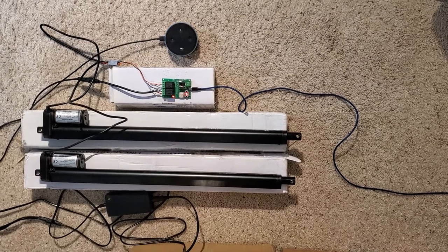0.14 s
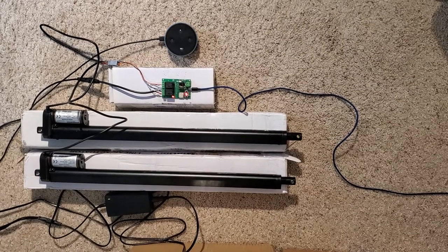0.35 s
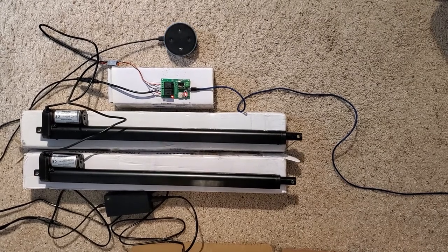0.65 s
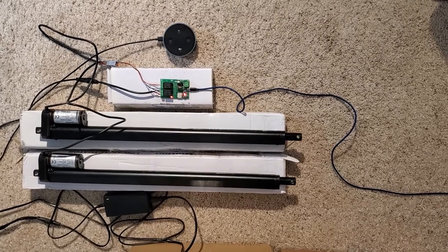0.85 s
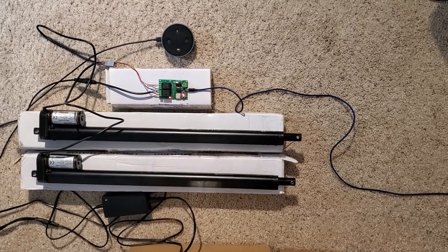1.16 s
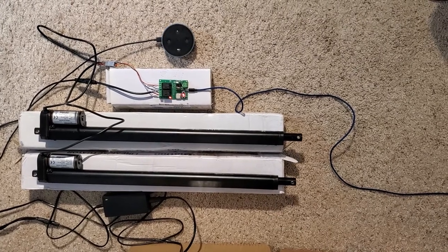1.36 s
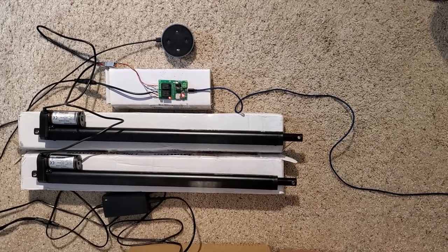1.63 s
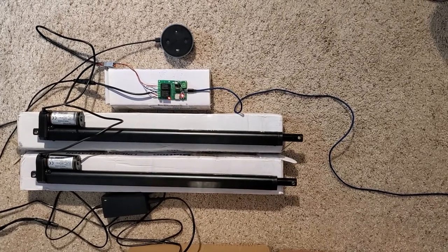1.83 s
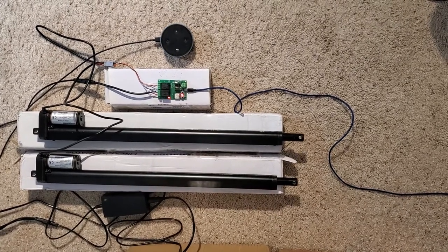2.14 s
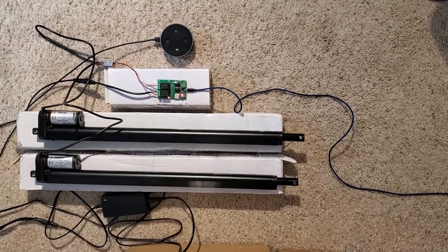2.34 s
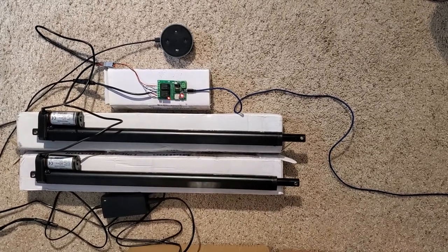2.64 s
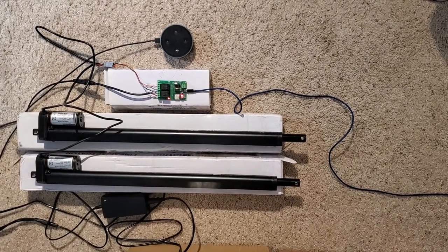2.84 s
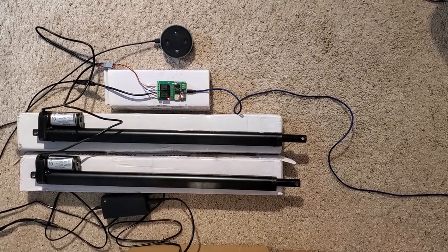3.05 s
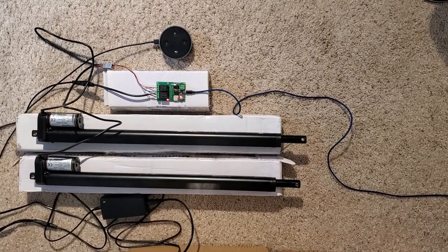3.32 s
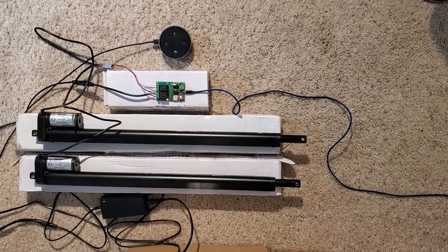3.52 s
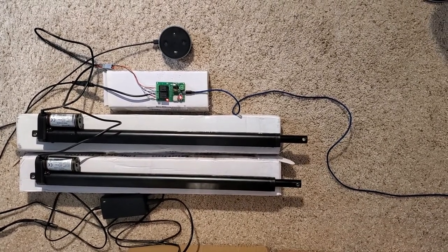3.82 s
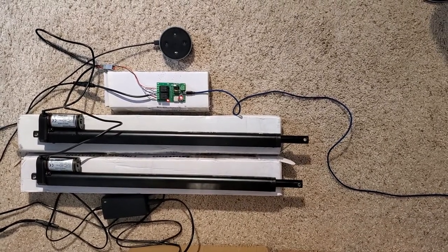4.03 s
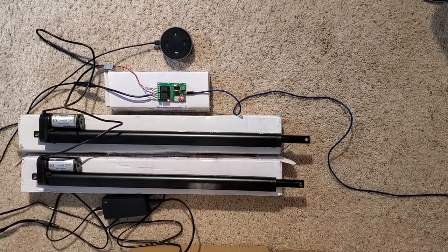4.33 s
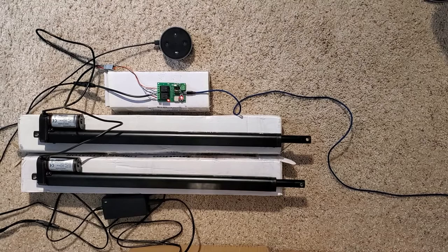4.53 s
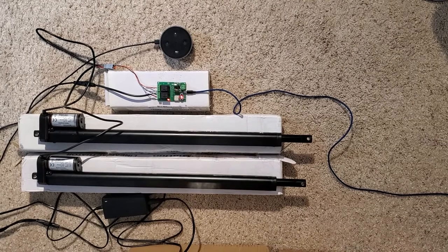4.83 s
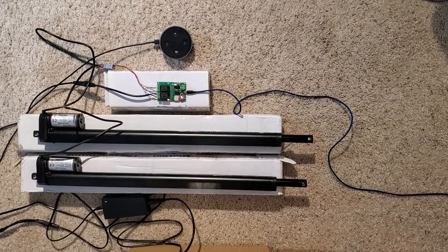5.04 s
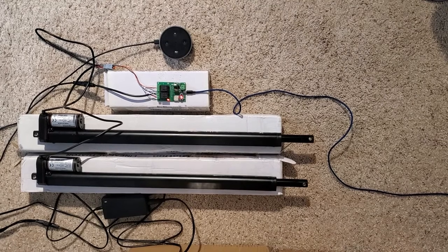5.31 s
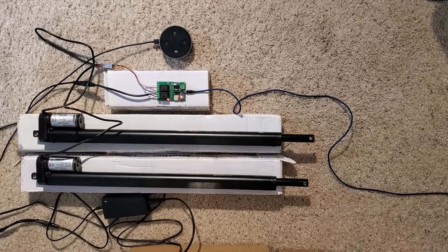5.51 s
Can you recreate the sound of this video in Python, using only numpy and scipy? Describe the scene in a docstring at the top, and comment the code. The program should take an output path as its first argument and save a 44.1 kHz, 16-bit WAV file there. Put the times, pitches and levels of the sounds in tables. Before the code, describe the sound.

A continuous geared motor whir from two drives side by side, with grainy rattle, brush hiss and a slightly growing whine.

```python
"""Two electric linear actuators push their rods out side by side on a carpeted floor, heard from about a metre above.
First both drives settle up to speed, the second slightly faster, so they beat: gear tones locked to each wheel sing
and throb once a turn, random tooth contact rattles the housings, and noise at the brushes hisses.
About halfway the first rod slides more freely: its drive speeds up a little and a motor whine grows.
Towards the end some gear tones have eased off and the hiss has risen; rumble, a faint drone and hum lie beneath."""
import sys
import numpy as np
from scipy import signal
from scipy.fft import rfft, irfft
from scipy.io import wavfile

SR = 44100
rng = np.random.default_rng(int(sys.argv[2]) if len(sys.argv) > 2 else 0)


def generate_wav(signal):
    """Clip the signal to [-1, 1] and save it as 16-bit WAV at the path in sys.argv[1]."""
    frames = np.transpose(np.atleast_2d(signal))
    scaled = np.clip(frames, -1, 1) * 32767
    pcm = np.round(scaled).astype(np.int16)
    wavfile.write(sys.argv[1], SR, pcm)


N = 250047
TIME = np.arange(N) / SR
FREQ = np.maximum(np.fft.rfftfreq(N, 1 / SR), 1)
SIDES = np.array([[1], [-1]])  # adds to the left, subtracts from the right
WHEEL_TURNS_PER_SCREW_TURN, MOTOR_TURNS_PER_WHEEL_TURN = 6, 5


def undb(db):
    """Decibels to gain."""
    return 10 ** (np.asarray(db) / 20)


def walk(rate):
    """Random zigzag with `rate` corners a second; spread near 0.46."""
    corners = rng.standard_normal(1024)
    return 0.56 * np.interp(TIME * rate, np.arange(len(corners)), corners)


def slope(table):
    """Gains along a spectrum of (frequency [Hz], level [dB], ..) points, one row for each level column."""
    hz, *columns = np.transpose(table)
    return undb([np.interp(np.log(FREQ), np.log(hz), column) for column in columns])


def resonances(table):
    """Left and right gains of steep-sided resonances, summed in power."""
    power = 0
    for hz, width, left, right in table:
        peak = 1 / (1 + (2 * (FREQ - hz) / width) ** 2) ** 2
        power = power + undb([[left], [right]]) ** 2 * peak
    return np.sqrt(power)


def colour(x, gain):
    """Bring a white signal to unit level, then give it the density `gain` per root Hz."""
    return irfft(rfft(x / x.std()) * gain * np.sqrt(SR / 2), N)


def room(x, wet_db, t60, apart_hz=1500, left_lead_s=0.00018):
    """Direct sound reaches the left first; a dense decaying tail differs between sides less and less for long waves."""
    decay = np.exp(-np.log(1000) * TIME / t60) * (TIME > .002)
    shared, apart = rfft(rng.standard_normal((2, N)) * decay)
    tail = shared + apart * np.minimum(FREQ / apart_hz, 1) * SIDES
    tail /= np.sqrt(np.mean(np.abs(tail) ** 2))
    direct = np.exp(-2j * np.pi * FREQ * np.array([[0], [left_lead_s]]))
    return irfft(rfft(x) * (direct + undb(wet_db) * tail), N)


def tones(table, turns, phases, flutter, flutter_rate, left_lead_s=.00007):
    """Partials locked to a wheel, left first; uneven tooth contact makes each flutter in level and phase."""
    out = np.zeros((2, N))
    wheel_hz = turns[-1] / TIME[-1]
    for (multiple, left, right), phase in zip(table, phases):
        angle = 2 * np.pi * multiple * turns + phase + flutter * walk(flutter_rate)
        lag = 2 * np.pi * multiple * wheel_hz * left_lead_s
        size = np.sqrt(2) * (1 + flutter * walk(flutter_rate))
        out += size * undb([[left], [right]]) * np.cos([angle, angle - lag])
    return out


def any_phases(table):
    """One random phase a row."""
    return rng.uniform(0, 2 * np.pi, len(table))


def in_step(table):
    """Zero phase for every row: the partials line up at one spot of the wheel and throb once a turn."""
    return np.zeros(len(table))


def scrape(turns, repeat, size=2600):
    """Rough surfaces in contact: a share `repeat` of the roughness power comes round again with every turn."""
    surface = rng.standard_normal(size)
    recurring = surface[(turns * size).astype(int) % size]
    return np.sqrt(repeat) * recurring + np.sqrt(1 - repeat) * rng.standard_normal(N)


def screw_load(turns, offset=.2):
    """The load swings between -1 and 1 once a turn of the lead screw."""
    screw_turns = turns / WHEEL_TURNS_PER_SCREW_TURN
    return np.cos(2 * np.pi * (screw_turns - offset))


def freedom(freed_at_s=2.75, freeing_s=.35):
    """How freely the first rod slides: rises smoothly from 0 (snug) to 1 (free)."""
    return (1 + np.tanh((TIME - freed_at_s) / freeing_s)) / 2


# Gear wheel speed of the first and second drive, before the swing with screw load:
# (settled rate [Hz], slower at the start by [Hz], settling time [s], faster once the first rod is free by [Hz])
DRIVE_SPEEDS = [(16.866, .07, .3, .074), (17.09, .17, .85, 0)]


def wheel_turns(settled_hz, slow_hz, settle_s, freed_hz, bind_sag=.0013):
    """Turns of a wheel that settles up to speed, gains with freedom and loses the share `bind_sag` at full load."""
    hz = settled_hz - slow_hz * np.exp(-TIME / settle_s) + freed_hz * freedom()
    unloaded_turns = np.cumsum(hz) / SR
    return np.cumsum(hz * (1 - bind_sag * screw_load(unloaded_turns))) / SR


# Gear tones of the first drive, before the sway; three low growling ones, then the ringing ones:
# (multiple of the wheel rate [-], left level [dB], right level [dB])
FIRST_GEAR_TONES = [(24, -48, -50), (25, -32, -34), (26, -49, -50), (30, -48, -48), (33, -47, -49),
                    (48, -47, -44), (65, -45, -45), (71, -49, -52), (74, -47, -47), (79, -48, -53),
                    (84, -53, -39), (85, -49, -53), (89, -56, -48), (95, -53, -52), (96, -36, -41),
                    (98, -60, -47), (108, -50, -53), (128, -47, -45), (139, -54, -46), (156, -49, -46),
                    (163, -55, -49), (181, -55, -46)]
# Tooth mesh of the slightly eccentric first wheel and its sidebands, before the lope:
# (multiple of the wheel rate [-], left level [dB], right level [dB])
TOOTH_MESH = [(34, -42, -44), (35, -39, -40), (36, -34, -36)]
# Tones that ease off as the rod comes out, at their mid-way level:
# (multiple of the wheel rate [-], left level [dB], right level [dB])
EASING_TONES = [(60, -38.5, -43), (143, -53, -47), (144, -47, -40), (145, -54, -48)]
# The commutator's octave and its sidebands, before the growth and sway:
# (multiple of the wheel rate [-], left level [dB], right level [dB])
COMMUTATOR_WHINE = [(116, -54, -52), (118, -43, -44), (119, -52, -52), (120, -32, -35), (121, -51, -49),
                    (123, -44, -40)]


def first_gears(turns, tight_spot=.88, whine_spot=0.864, ease_spot=.38,
                low_sway_db=0.5, high_sway_db=-0.26, whine_sway_db=1.9, ease_db=8, lope_db=0.9,
                whine_snug_db=-13, whine_free_db=-1.5):
    """The louder drive: tones that sway with the screw, a throbbing mesh, easing tones and a growing whine."""
    load = screw_load(turns)
    growl, ring = FIRST_GEAR_TONES[:3], FIRST_GEAR_TONES[3:]
    low = tones(growl, turns, any_phases(growl), flutter=.04, flutter_rate=12)
    high = tones(ring, turns, any_phases(ring), flutter=.15, flutter_rate=30)
    # each spot is the point of the wheel, in turns, where that group swells
    mesh = tones(TOOTH_MESH, turns - tight_spot, in_step(TOOTH_MESH), flutter=.13, flutter_rate=16)
    easing = tones(EASING_TONES, turns - ease_spot, in_step(EASING_TONES), flutter=.1, flutter_rate=20)
    whine = tones(COMMUTATOR_WHINE, turns - whine_spot, in_step(COMMUTATOR_WHINE), flutter=.15, flutter_rate=13)

    out = low * undb(low_sway_db * load) + high * undb(high_sway_db * load)
    # the mesh lopes four times a screw turn
    out += mesh * undb(lope_db * screw_load(4 * turns))
    out += easing * undb(ease_db * (.5 - TIME / TIME[-1]))
    whine_db = whine_snug_db + (whine_free_db - whine_snug_db) * freedom()
    return out + whine * undb(whine_db - whine_sway_db * load)


# Gear tones of the second drive: (multiple of the wheel rate [-], left level [dB], right level [dB])
SECOND_GEAR_TONES = [(25, -45, -45), (26, -49, -49), (30, -53, -53), (34, -50, -50), (36, -46, -46),
                     (48, -45, -41), (60, -55, -55), (96, -50, -50), (105, -53, -51), (120, -50, -45),
                     (143, -54, -48)]


def second_gears(turns):
    """The quieter drive runs less evenly, so its tones flutter more."""
    return tones(SECOND_GEAR_TONES, turns, any_phases(SECOND_GEAR_TONES), flutter=.2, flutter_rate=9)


# Resonances of the gear housings and tubes, before the bass loss and throbs:
# (frequency [Hz], width [Hz], left level [dB per Hz], right level [dB per Hz])
HOUSING_RESONANCES = [(423, 34.3, -55, -49.5), (510, 28, -86, -83), (584, 172, -57, -59),
                      (728, 82, -67, -62.5), (804, 49, -61.5, -63), (970, 88, -69, -66.5),
                      (1065, 100, -60, -67.5), (1234, 145, -59.5, -74), (1287, 104, -63, -57),
                      (1474, 45, -82.5, -64.5), (1485, 95, -71, -63), (1620.5, 35, -59, -62.5),
                      (1850, 90, -80, -103), (2088, 460, -60, -58.5), (2200, 160, -60, -60.5),
                      (2383, 170, -83, -57), (2700, 92, -89, -62), (2793, 100, -84, -62),
                      (3010, 120, -62, -64.5), (3630, 770, -68.5, -62.5), (4190, 334, -64.5, -62),
                      (5146, 360, -66.5, -61)]
# Bands of the rattle that throb with the first wheel:
# (frequency [Hz], width [Hz], level [dB], swell once a turn [dB], its spot [turns],
#  chatter three times a turn [dB], its spot [turns])
RATTLE_THROBS = [(575, 230, -2, 4, .76, 2, 0.69), (1290, 280, 0, 3, 0.53, 3, .68)]


def rattle(first, second, swell_db=0.5, loose_spot=.76, shaft_db=2.0, knock_db=3, second_db=-4, low_hz=340):
    """Teeth knock and slide in time with wheel, motor and mesh; the housings are too small to radiate bass."""
    teeth = TOOTH_MESH[-1][0]
    force = 0
    for turns, drive_db in ((first, 0), (second, second_db)):
        angle = 2 * np.pi * (turns - loose_spot)
        contact_db = swell_db * np.cos(angle)
        contact_db += shaft_db * np.cos(MOTOR_TURNS_PER_WHEEL_TURN * angle)
        contact_db += knock_db * np.cos(teeth * angle)
        force = force + scrape(turns, repeat=0.068) * undb(drive_db + contact_db)

    heard = room(force, wet_db=-3.0, t60=0.089)
    radiation = 1 / np.sqrt(1 + (low_hz / FREQ) ** 16)
    gain = resonances(HOUSING_RESONANCES) * radiation
    out = 0
    for hz, width, level_db, swell, spot, chatter, chatter_spot in RATTLE_THROBS:
        share = 1 / (1 + (2 * (FREQ - hz) / width) ** 8)
        throb_db = swell * np.cos(2 * np.pi * (first - spot))
        throb_db += chatter * np.cos(3 * 2 * np.pi * (first - chatter_spot))
        out = out + undb(level_db + throb_db) * colour(heard, gain * share)
        gain = gain * (1 - share)  # leave the rest of the spectrum for what follows
    return out + colour(heard, gain)


# Brush hiss spectrum, before the bass loss and rise: (frequency [Hz], left level [dB per Hz], right level [dB per Hz])
BRUSH_HISS = [(1020, -69, -74), (3150, -71, -64.5), (4540, -70.5, -70), (5710, -71, -68.5),
              (6720, -79.5, -83), (8100, -77, -75.5), (8900, -70, -87.5), (10840, -75.5, -70.5),
              (11700, -62.5, -80), (13300, -74, -67), (13600, -59, -92), (14640, -70, -72),
              (16000, -76, -62.5)]
# High resonances of the brush holders, before the rise:
# (frequency [Hz], width [Hz], left level [dB per Hz], right level [dB per Hz])
HOLDER_RESONANCES = [(12040, 370, -60, -71.5), (12510, 530, -58, -58.5)]
# Ripple of the brush pressure: (multiple of the wheel rate [-], depth [0-1])
PRESSURE_RIPPLE = [(1, .07), (2, .17), (10, .22), (14, .15), (24, .11), (60, .22), (70, .12)]


def brushes(first, second, second_db=-3, rise_db=1.36, sway_db=0.5, low_hz=600):
    """Brushes scrape over the commutator bars; the hiss pulses with rotation, sways with load and grows a little."""
    hiss = 0
    for turns, drive_db in ((first, 0), (second, second_db)):
        pressure = 1
        for multiple, depth in PRESSURE_RIPPLE:
            pressure = pressure + depth * np.cos(2 * np.pi * (multiple * turns + rng.random()))
        sway = undb(drive_db + sway_db * screw_load(turns))
        hiss = hiss + sway * pressure * scrape(turns, repeat=0.01)

    bass_loss = 1 / (1 + (low_hz / FREQ) ** 4)
    gain = np.hypot(slope(BRUSH_HISS), resonances(HOLDER_RESONANCES)) * bass_loss
    return colour(room(hiss, wet_db=-0.5, t60=0.45), gain) * undb(rise_db * TIME / TIME[-1])


# Quiet room rumble, the part shared by both sides: (frequency [Hz], level [dB per Hz])
ROOM_RUMBLE = [(20, -90), (45, -85), (85, -81.5), (130, -83.5), (180, -87.5), (260, -88.5), (400, -74.5),
               (1000, -100)]
# Faint narrow drone, the part shared by both sides:
# (frequency [Hz], width [Hz], left level [dB per Hz], right level [dB per Hz])
ROOM_DRONE = [(217.4, 11.5, -82, -78)]


def background(side_db=-9, hum_hz=120.1, hum_db=-61.5):
    """Shaped noise, nearly alike on both sides, makes low rumble and a faint drone; a steady sine is mains hum."""
    mid, side = rng.standard_normal((2, N))
    gain = np.hypot(slope(ROOM_RUMBLE), resonances(ROOM_DRONE))
    rumble = colour(mid + undb(side_db) * side * SIDES, gain)
    hum = np.sqrt(2) * undb(hum_db) * np.sin(2 * np.pi * hum_hz * TIME)
    return rumble + hum


def scene():
    """Both drives run throughout in a quiet room."""
    first, second = (wheel_turns(*drive) for drive in DRIVE_SPEEDS)
    gears = first_gears(first) + second_gears(second)
    return gears + rattle(first, second) + brushes(first, second) + background()


def record(dry, fade_s=0.0015, top_hz=15780):
    """Short fades open and close the sound without a click; a steep low-pass removes the extreme top."""
    edges = np.minimum(np.minimum(TIME, TIME[-1] - TIME) / fade_s, 1)
    low_pass = signal.ellip(12, .1, 80, top_hz, fs=SR, output="sos")  # order, ripple dB, rejection dB
    return signal.sosfilt(low_pass, dry * edges)


dry = scene()
out = record(dry)
generate_wav(out)
```